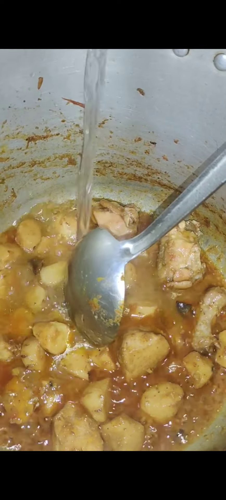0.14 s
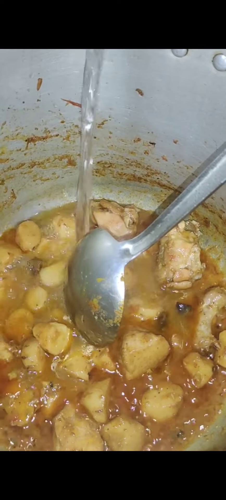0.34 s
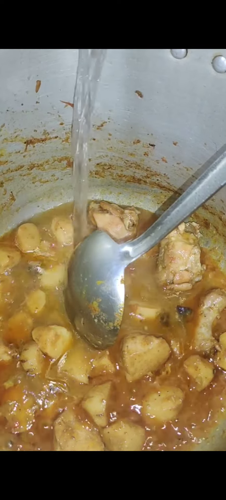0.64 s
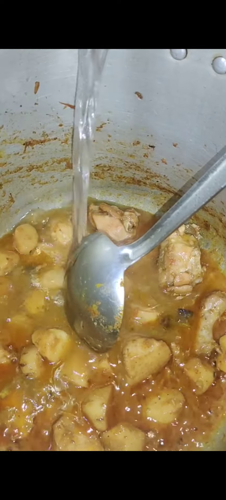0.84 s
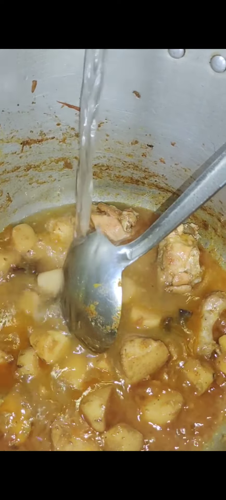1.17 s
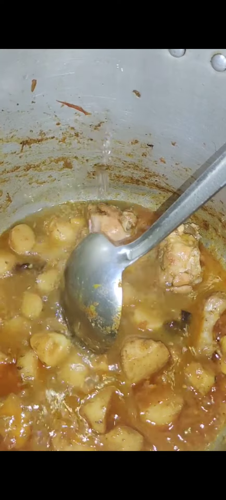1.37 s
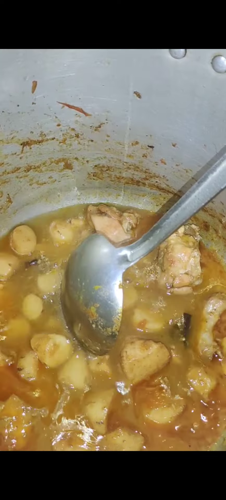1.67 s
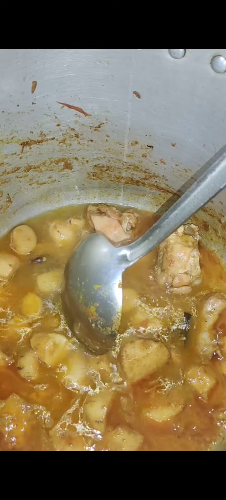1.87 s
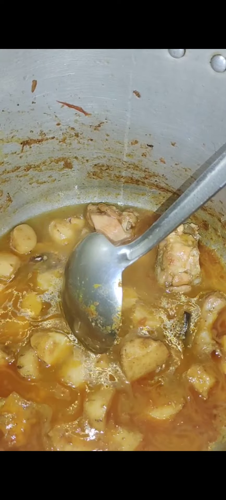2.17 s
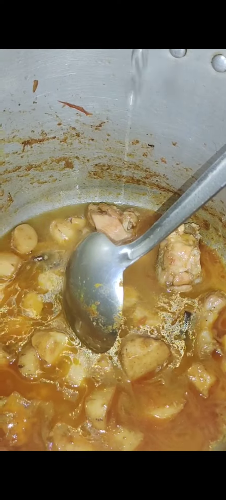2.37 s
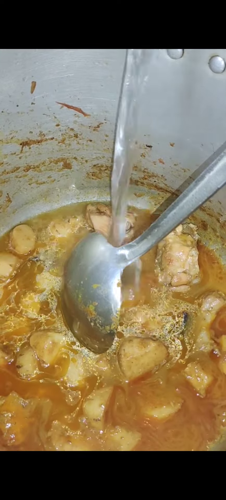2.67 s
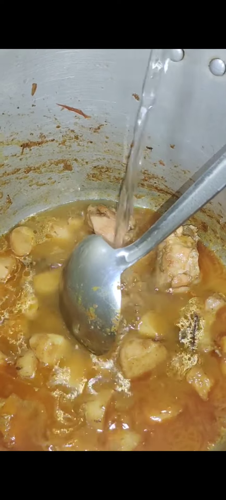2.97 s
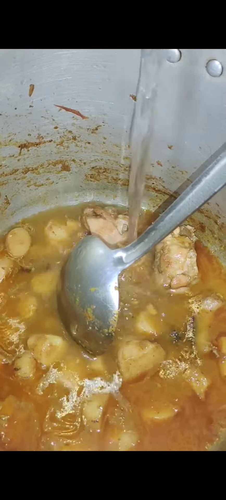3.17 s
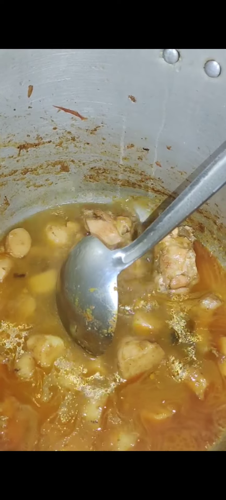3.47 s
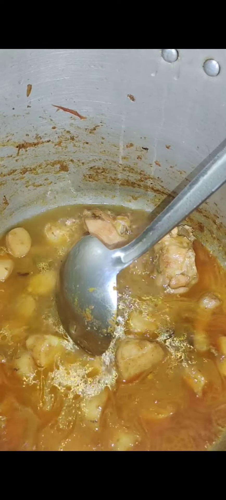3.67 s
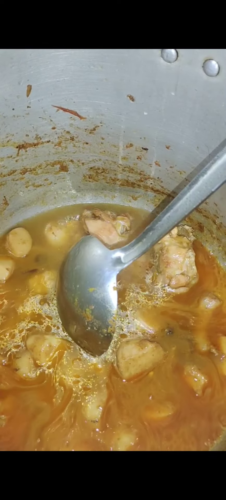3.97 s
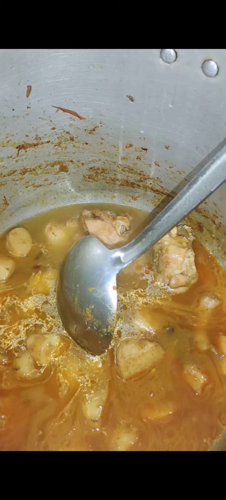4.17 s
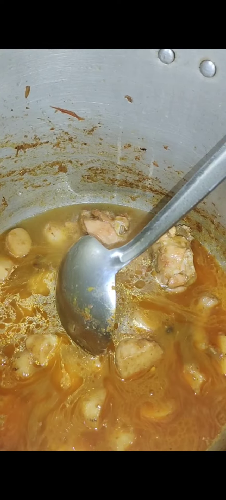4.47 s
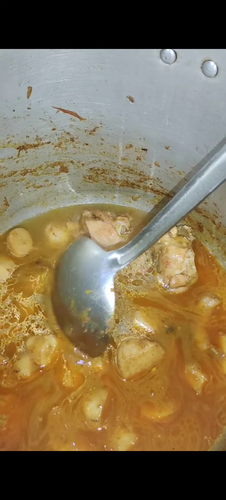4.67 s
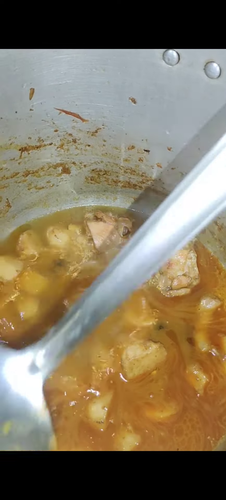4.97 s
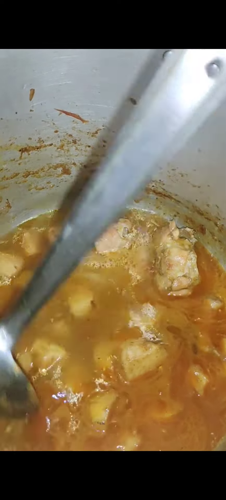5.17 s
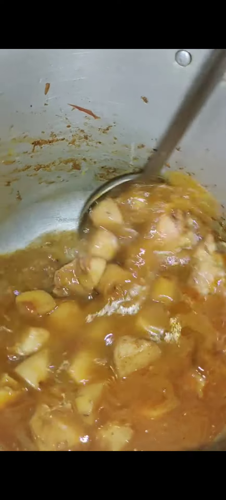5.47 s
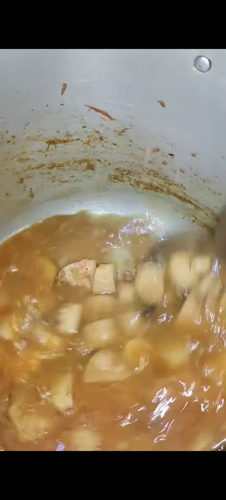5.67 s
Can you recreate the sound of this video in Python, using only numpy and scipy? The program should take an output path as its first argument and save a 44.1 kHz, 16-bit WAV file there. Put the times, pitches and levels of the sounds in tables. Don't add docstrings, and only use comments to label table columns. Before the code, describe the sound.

A close, phone-like capture in a small kitchen with a short room echo. A quiet flame roar, fine simmer and faint hum run throughout. From 0 to about 1.55 s water splashes into stew, thin and crisp, easing before strengthening around 1 s, with high bubble plinks and tiny drop bursts. Low, lumpy air thumps hit the microphone from 0.5 to 1.4 s. Only drips and simmer remain until a second, shorter pour from 2.6 to 3.55 s. Stronger thumps follow at 3.4-3.95 s. At 4.2 s a jug lands with a hollow metallic clunk, then rocks softly near 4.4 s. A ladle bowl scrapes faintly at 4.77 s and knocks clearly at 5.09 s. Stew sloshes from 5.2 s, with drops and soft metal singing around 5.4-5.65 s. The loudest sharp pot knock comes at 5.68 s, rebounding in rapid chatter before fading, with a small low gust near 5.8 s.

```python
import sys
import numpy as np
from scipy import signal
from scipy.fft import rfft, irfft
from scipy.io import wavfile

SR = 44100
rng = np.random.default_rng(int(sys.argv[2]) if len(sys.argv) > 2 else 0)


def invert_db(x):
    u = np.asarray(x, float) / 20
    return 10 ** u


def store_pcm(level_fs):
    pcm = np.round(np.clip(level_fs, -1, 1) * 32767).astype(np.int16)
    wavfile.write(sys.argv[1], SR, np.atleast_2d(pcm).T)


N = 257176
TIME_S = np.arange(N) / SR

# (time [s], level [dB])
POUR_FLOW = [
    [(0, -39.5), (0.12, -48.5), (0.77, -53), (1.0, -42.5), (1.35, -44.5), (1.53, -50), (1.57, -63.5),
     (1.85, -56.5), (2.3, -81)],
    [(2.55, -79), (2.6, -63), (2.78, -44), (2.95, -47), (3.16, -57.5), (3.2, -54.5), (3.4, -52.5),
     (3.52, -52), (3.57, -70.5)],
]
# (frequency [Hz], density [dB per Hz])
SPLASH_SPECTRUM = [(1290, -1), (2200, -5), (2570, -29), (2950, -15), (3420, 1.5), (3680, -3.5), (4130, -1),
                   (5860, -4), (7130, 2), (10100, -16.5), (15500, -24.5)]
# (time [s], length [s], frequency [Hz], level [dB])
BUBBLE_RUNS = [(2.69, 0.084, 3300, -54), (2.755, 0.055, 3020, -48), (2.77, 0.032, 4180, -46),
               (2.775, 0.073, 1990, -48), (2.825, 0.024, 3400, -49), (2.88, .1, 3260, -55.0),
               (3.18, 0.13, 5240, -55), (3.195, 0.027, 3410, -50), (3.44, 0.099, 5190, -53),
               (3.44, 0.085, 3300, -49.5), (3.47, 0.073, 6670, -49.5)]
# (time [s], peak level [dB], frequency [Hz])
BUBBLES = [(0.1166, -31, 6770), (0.3134, -30, 3900), (0.5352, -29, 7030), (0.5651, -27, 7070),
           (0.7864, -31.5, 3950), (0.851, -30, 6500), (0.9065, -21.5, 6950), (0.9457, -27, 6500),
           (0.983, -22.5, 4230), (1.0191, -23, 7060), (1.1393, -23, 7200), (1.1867, -27, 6700),
           (1.2353, -24.5, 4300), (1.28, -25, 3960), (1.3189, -22, 7100), (1.3508, -25, 5630),
           (1.5286, -31, 6600), (2.5907, -28.5, 7000), (2.77, -26, 3030), (2.825, -24.5, 3960),
           (2.8624, -29, 7270), (2.891, -25, 3970), (2.9243, -29, 6500), (2.965, -31, 4500),
           (3.3117, -30.5, 3020), (3.4443, -23.5, 5150)]
# (time [s], peak level [dB])
SPLATS = [(0.1835, -34.5), (0.2548, -35), (0.5282, -42), (0.634, -48), (0.8325, -42), (0.857, -44),
          (0.9066, -32), (0.9817, -33), (1.0261, -33), (1.1159, -40), (1.1393, -35), (1.2221, -41),
          (1.281, -31.5), (1.3274, -28.5), (1.476, -37), (1.4894, -31.5), (2.1051, -48), (2.571, -40.5),
          (2.634, -38.5), (2.823, -33), (2.913, -33), (3.1148, -40), (3.1966, -40.5), (3.3762, -43),
          (3.4695, -36.5), (5.207, -36), (5.493, -34), (5.5094, -33), (5.554, -32), (5.5694, -46)]
GURGLE_DB, GURGLE_SHARE, MEAN_FLOW_DB = -56.5, 0.69, -49

# (frequency [Hz], level [dB], t60 [s])
JUG_MODES = [(292.6, 2.5, 0.36), (520, -28, 2.2), (660, -20, 5.0), (763, -2.5, 0.074), (843, -11.5, 1.0),
             (1005, -15, 0.35), (1010, -23, 0.34), (1195, -28, 0.36), (1600, -14, 0.45), (1990, -25, 0.83),
             (2245, -27, 0.25), (2580, -28, 0.3), (2760, -43, 0.58), (3690, -6, 0.34), (3827, -9.5, 0.14),
             (4900, -14, 0.12), (5110, -15, 0.14), (5600, -19, 0.092), (6320, -7, 0.027), (6860, -16, 0.22),
             (6950, -15.5, 0.28), (7350, -18, 0.2), (7203, -32, 0.38), (7250, -29, 0.1), (8040, -23, 0.24),
             (8570, -39, 0.29)]
LADLE_MODES = [(359, -11.5, 0.32), (624, -47, 5.0), (1157, -43, 0.17), (1330, -0.5, 0.21),
               (1526, -17, 0.39), (1670, -16, 0.19), (1933, -31, 0.11), (2050, -30, 0.32),
               (2025, -7.5, 0.063), (2258, -3.5, 0.16), (2685, -10, 0.18), (2920, -11, 0.072),
               (3300, -36, 0.34), (3400, -22, 0.086), (3960, -13, 0.068), (4700, -23, 0.13),
               (5340, -33, 0.16), (6930, -5, 0.033), (7450, -12, 0.12), (8200, -10, 0.051),
               (8748, -37, 0.15), (8920, -43, 0.19)]
POT_MODES = [(316, -30, 5.0), (667, -0.5, 0.13), (1270, -41, 5.0), (1440, -12.5, 0.15), (1760, -40, 5.0),
             (2044, -7, 0.29), (2315, -7, 0.14), (2960, -28, 0.19), (3496, -10, 0.15), (3590, -7, 0.13),
             (3770, -5.5, 0.094), (4200, -6, 0.16), (4100, -21, 0.11), (4310, -7, 0.12), (4500, -21, 0.13),
             (4830, -18, 0.08), (5100, -19, 0.079), (5300, -7, 0.074), (5560, -12, 0.21), (5850, -1, 0.078),
             (6100, -33, 5.0), (6300, -22, 0.18), (6368, -32, 0.4), (6471, -23, 0.23), (6600, -18, 0.12),
             (6900, -11, 0.08), (7220, -5, 0.079), (7500, -16, 0.15)]
BOWL_MODES = [(312, -13, 0.092), (918, -10, 5.0), (1634, -20, 5.0), (1990, -15.5, 0.99), (2353, -7, 0.43),
              (2557, -13, 0.19), (2840, -6, 0.08), (3480, -23, 5.0), (4130, -15, 0.16), (4610, -13, 0.12),
              (5300, -23, 0.34), (6891, -10, 0.16)]
# (frequency [Hz], density [dB per Hz])
JUG_CLATTER = [(120, -54), (200, -42), (288, -7), (366, -7), (746, -4), (912, -15.5), (3050, -34),
               (3660, -32), (7070, -19.5), (12900, -38.5), (15800, -47)]
LADLE_CLATTER = [(120, -50), (200, -34), (379, -6), (863, -9), (1310, -8), (1830, -12), (2150, -5.5),
                 (4010, -17), (4390, -18.5), (7070, -19.5), (15800, -51)]
POT_CLATTER = [(120, -52), (200, -25), (464, -23), (668, -13.5), (1220, -26), (1470, -20.5), (3100, -22.5),
               (4240, -15), (7330, -27), (13200, -55.5), (15800, -79)]
# (time [s], length [s], first level [dB], last level [dB], clatter level [dB])
JUG_TOUCHES = [
    (4.205, 0.0063, -21, -15.5, -20),
    (4.243, 0.0061, -41, -24, -47),
]
JUG_ROCKING = [
    (4.385, 0.029, -41, -36, -55),
    (4.433, 0.021, -29, -33.5, -32.5),
    (4.483, 0.0042, -41, -42, -44),
]
BOWL_TOUCHES = [
    (4.768, 0.056, -38, -31.5, -47.5),
    (5.206, .03, -56, -64, -56),
]
LADLE_TOUCHES = [
    (5.091, 0.023, -20, -22, -24),
]
POT_TOUCHES = [
    (5.676, 0.017, -15, -26.5, -15.5),
    (5.692, 0.018, -23.5, -17.5, -31.5),
    (5.708, 0.0182, -20.5, -19, -22),
    (5.73, 0.056, -37.5, -34.5, -38.5),
]

# (time [s], length [s], frequency [Hz], level [dB])
WALL_SONG = [(4.76, .04, 306, -34.5), (5.36, 0.097, 344, -40), (5.435, 0.111, 314, -34),
             (5.55, 0.16, 340, -36), (5.45, 0.21, 885, -39.5), (5.455, 0.03, 2000, -37.5),
             (5.505, 0.09, 1770, -40.5), (5.485, 0.045, 2350, -40.5), (5.39, 0.089, 3500, -54),
             (5.5, .04, 380, -38)]
# (time [s], length [s], frequency [Hz], level [dB])
JUG_SONG = [(4.232, 0.074, 991, -27.5), (4.205, .11, 293, -29.5), (4.43, 0.0342, 293, -29)]
# (time [s], level [dB])
STIR_LEVEL = [(5.196, -72), (5.204, -51.5), (5.476, -42.5), (5.51, -36), (5.535, -45), (5.62, -43.5),
              (5.665, -50)]
# (frequency [Hz], density [dB per Hz])
SLOSH_SPECTRUM = [(1470, 0.5), (2500, -5.5), (3000, -16), (3340, -3), (3920, -3.5), (4820, -8), (6690, 0),
                  (9290, -16), (15500, -34)]

# (time [s], peak level [dB], rise [ms])
EDDIES = [(0.674, -19, .76), (0.708, -20, 0.7), (0.782, -14, 0.8), (0.852, -17.5, 0.61), (0.892, -13, 0.6),
          (0.925, -11.5, 0.51), (1.041, -13.5, 0.67), (1.065, -17, 0.88), (1.117, -19, 0.87),
          (1.162, -16, 0.82), (3.423, -12.5, 0.76), (3.493, -16, 0.61), (3.547, -11, 0.55),
          (3.565, -19.5, 0.37), (3.586, -10.5, 0.45), (3.632, -10.5, 0.54), (3.68, -4.5, 0.81),
          (3.721, -5, 0.74), (3.764, -24, .4), (3.807, -7.5, 0.44), (3.839, -14, 0.81),
          (3.878, -19.5, 0.56), (3.953, -17.5, 1.7)]
# (start [s], peak [s], end [s], rumble level [dB])
GUSTS = [(0.519, 0.94, 1.225, -18.5), (1.23, 1.31, 1.39, -32.5), (1.472, 1.528, 1.556, -27),
         (1.63, 1.7, 1.8, -38.5), (3.422, 3.73, 3.89, -16.5), (5.78, 5.787, 6.04, -28.5)]
SWELL_DB, SINK_DB, GUST_EDGE_S = 15.5, 10.5, 0.014

# (frequency [Hz], density [dB per Hz])
SIMMER_SPECTRUM = [(29, -42), (50, -2), (81, 0), (122, -26), (163, -0.5), (222, -17), (263, -9.5),
                   (503, -9.5), (541, -14), (795, -16.5), (987, -18.5), (1090, -18.5), (1320, -22),
                   (1520, -22), (15700, -55.5)]
SIMMER_DB = -44
# (frequency
# [Hz], width [Hz], level [dB])
STEADY_HUMS = [(172, 120, -53.5), (299.3, 24.5, -53.5), (3480, 12, -74.5), (4600, 13, -76.0),
               (6890, 720, -65)]

KITCHEN_T60_S, KITCHEN_DB = 0.36, -12
BASS_CUT_HZ, TOP_HZ = 105, 15750


def rms_one(x):
    return x / np.sqrt(np.mean(x ** 2) + 1e-20)


def drift(rate_hz):
    r = np.exp(-80 * np.pi * rate_hz / SR)
    noise = rng.standard_normal(N // 40 + 2002)
    slow = signal.lfilter([1], [1, -2 * r, r * r], noise)[2000:]
    return np.interp(np.arange(N) / 40, np.arange(len(slow)), rms_one(slow))


def colour(x, spectrum):
    hz, db = np.transpose(spectrum)
    log_hz = np.log(np.arange(len(x) // 2 + 1) * SR / len(x) + 1)
    gain = invert_db(np.interp(log_hz, np.log(hz), db, left=-90, right=-90))
    return rms_one(irfft(rfft(x) * gain, len(x)))


def ring(clicks, hz, t60_s):
    r, w = invert_db(-60 / (t60_s * SR)), 2 * np.pi * hz / SR
    return signal.lfilter([0, np.sin(w)], [1, -2 * r * np.cos(w), r * r], clicks + 1e-18)


def grains(per_s, spread_db, size=N):
    heights = invert_db(spread_db * np.minimum(rng.exponential(1, size), 4))
    heights = heights * rng.choice([-1, 1], size)
    return heights * (rng.random(size) < per_s / SR)


def spells(rows, per_s, width_hz):
    out = np.zeros(N)
    for start_s, length_s, hz, db in rows:
        swell = np.sin(np.pi * np.clip((TIME_S - start_s) / length_s, 0, 1)) ** 0.5
        sung = swell * ring(grains(per_s, 3.4), hz, 2.75 / max(width_hz, 5))
        out += invert_db(db - 2.0) * rms_one(sung) * np.sqrt(length_s * SR / N)
    return out


def stream():
    flow_s, flow_db = np.transpose([row for pour in POUR_FLOW for row in pour])
    flow_db = np.interp(TIME_S, flow_s, flow_db)
    fizz = swarm(450.0, 3030, 8900, cycles=33.0)
    splash = spray(220.0, SPLASH_SPECTRUM, smooth=0.24) + invert_db(-2.5) * fizz
    gurgle_db = GURGLE_DB + GURGLE_SHARE * (flow_db - MEAN_FLOW_DB)
    gurgle = invert_db(gurgle_db) * swarm(500.0, 1310, 2330, cycles=31.0)
    wet = invert_db(flow_db - 3.0) * splash + gurgle
    pouring = TIME_S < POUR_FLOW[-1][-1][0]
    return wet * pouring + spells(BUBBLE_RUNS, per_s=140.0, width_hz=150.0)


def puffs(per_s):
    burst = np.exp(-np.arange(600) / (0.002 * SR))
    drops = np.abs(grains(per_s * invert_db(3.7 * drift(15)), 5.7))
    return rms_one(signal.fftconvolve(drops, burst)[:N])


def spray(per_s, spectrum, smooth):
    wide = puffs(0.34 * per_s)
    out = np.zeros(N)
    edges_hz = np.geomspace(1500, 16000, 8)
    for low_hz, high_hz in zip(edges_hz, edges_hz[1:]):
        band_pass = signal.butter(2, [low_hz, high_hz], "band", fs=SR, output="sos")
        band = signal.sosfilt(band_pass, rng.standard_normal(N))
        out += band * (smooth + 0.12 * wide + 0.54 * puffs(0.6 * per_s))
    return colour(out, spectrum)


def swarm(per_s, low_hz, high_hz, cycles):
    out = np.zeros(N)
    for hz in np.geomspace(low_hz, high_hz, 20):
        clicks = grains(per_s / 20 * invert_db(7.6 * drift(8)), 2.07)
        out += ring(clicks, hz, cycles / hz)
    return rms_one(out)


def bubbles():
    out, t = np.zeros(N), np.arange(1500) / SR
    for start_s, db, hz in BUBBLES:
        i = round(start_s * SR)
        fall = invert_db(db - 6.0 - 60 * t * hz / 103.0)
        attack = np.minimum(t / 0.00043, 1)
        out[i:i + len(t)] += fall * attack * np.sin(2 * np.pi * hz * t * (1 + 1.0 * t))
    return out


def splats():
    hits = np.zeros(N)
    hits[[round(s * SR) for s, db in SPLATS]] = invert_db(np.array(SPLATS)[:, 1] - 7.5)
    envelope = signal.fftconvolve(hits, np.exp(-np.arange(900) / (0.0096 * SR)))[:N]
    high_pass = signal.butter(2, 4500, "high", fs=SR, output="sos")
    bright = signal.sosfilt(high_pass, colour(rng.standard_normal(N), SPLASH_SPECTRUM))
    return envelope * rms_one(bright)


def blows():
    out = strike(JUG_TOUCHES, JUG_MODES, JUG_CLATTER, soft_hz=15000, longest_s=0.28, damp_db=2.0, t60_s=0.19)
    out += strike(JUG_ROCKING, JUG_MODES, JUG_CLATTER, soft_hz=500, longest_s=0.17, damp_db=2.1, t60_s=0.16)
    out += strike(BOWL_TOUCHES, BOWL_MODES, LADLE_CLATTER, soft_hz=15000, longest_s=0.27, damp_db=1.0, t60_s=0.14)
    out += strike(LADLE_TOUCHES, LADLE_MODES, LADLE_CLATTER, soft_hz=15000, longest_s=0.29, damp_db=7.5, t60_s=0.14)
    out += strike(POT_TOUCHES, POT_MODES, POT_CLATTER, soft_hz=15000, longest_s=0.13, damp_db=12.5, t60_s=0.26)
    return out


def strike(touches, modes, clatter, soft_hz, longest_s, damp_db, t60_s):
    out = np.zeros(N)
    soft = signal.butter(1, min(soft_hz, 20000), fs=SR)
    for start_s, length_s, first_db, last_db, clatter_db in touches:
        i = round(start_s * SR)
        t = np.arange(min(N - i, SR // 2)) / SR
        late_s = np.maximum(t - length_s, 0)
        swell_db = (last_db - first_db) * np.clip(t / max(length_s, 0.001), 0, 1)
        chatter = grains(900, 2.55, size=len(t)) * (t < length_s) / np.sqrt(1 + 1800 * length_s)
        chatter[20] = 0.47
        chatter = signal.lfilter(*soft, chatter * invert_db(first_db + swell_db))
        rings = mode_rings(chatter, modes, longest_s)
        haze = clatter_haze(clatter, late_s / max(t60_s, 0.01))
        haze *= invert_db(clatter_db + swell_db) * np.minimum(t / 0.0012, 1)
        damping = invert_db(-damp_db * (1 - np.exp(-late_s / 0.005)))
        out[i:i + len(t)] += (rings + haze) * damping
    return out


def mode_rings(chatter, modes, longest_s):
    out = np.zeros(len(chatter))
    for (hz, db, mode_t60_s), (u, split) in zip(modes, rng.normal(0, 1, (len(modes), 2))):
        decay_s = np.clip(mode_t60_s, 0.02, longest_s)
        pair = ring(chatter, hz, decay_s) + ring(chatter, hz * (1 + 0.007 * split), decay_s)
        out += invert_db(db + 1.3 * u - 4.5) * np.sign(u) * pair
    return out


def clatter_haze(clatter, after):
    haze = colour(rng.standard_normal(len(after)), clatter)
    lows = signal.sosfiltfilt(signal.butter(2, 2500, fs=SR, output="sos"), haze)
    return (lows + (haze - lows) * invert_db(-35.0 * after)) * invert_db(-60 * after)


def stirring():
    fizz = colour(swarm(400.0, 1597, 8000, cycles=130.0), SLOSH_SPECTRUM)
    slosh = 0.78 * spray(200.0, SLOSH_SPECTRUM, smooth=0.9) + invert_db(-3.0) * fizz
    stir_s, stir_db = np.transpose(STIR_LEVEL)
    slosh = slosh * invert_db(np.interp(TIME_S, stir_s, stir_db, left=-140, right=-140))
    wall = spells(WALL_SONG, per_s=900.0, width_hz=33.0)
    jug = spells(JUG_SONG, per_s=1200.0, width_hz=9.9)
    return wall + jug + slosh


def draughts():
    soft = signal.butter(4, 330, fs=SR, output="sos")
    pushes = signal.sosfilt(soft, grains(150, 3.16) + 0.048 * rng.standard_normal(N))
    lumps = rms_one(ring(pushes, 101, 0.017)) + 0.43 * rms_one(pushes)
    eddies, t = np.zeros(N), np.arange(2000) / SR
    for start_s, db, rise_ms in EDDIES:
        i = round((start_s + 0.00353) * SR)
        turn = 1000 * t / np.clip(rise_ms, 0.25, 3)
        eddies[i:i + len(t)] -= invert_db(db + 2.5) * turn ** 3 * np.exp(-turn) * (1 - turn / 4.3)
    return lumps * invert_db(-1.5) * gusts() + eddies


def gusts():
    gain = np.zeros(N)
    for start_s, peak_s, end_s, db in GUSTS:
        corners_s = [start_s - GUST_EDGE_S, start_s, peak_s, end_s, end_s + GUST_EDGE_S]
        shape_db = np.interp(TIME_S, corners_s, [-40, -SWELL_DB, 0, -SINK_DB, -40], left=-99, right=-99)
        gain += invert_db(db + shape_db)
    return gain


def simmer():
    out = invert_db(SIMMER_DB + 0.61 * drift(4)) * colour(rng.standard_normal(N), SIMMER_SPECTRUM)
    for hz, width_hz, db in STEADY_HUMS:
        hum = rms_one(ring(rng.standard_normal(N), hz, 2.44 / width_hz))
        out += hum * invert_db(db + 2.0 * drift(6.0))
    return out


def kitchen(x):
    t = np.arange(SR // 2) / SR
    tail = rng.standard_normal(len(t)) * invert_db(-60 * t / KITCHEN_T60_S) * (t > 0.006)
    tail = signal.lfilter([1], [1, -0.5], tail)
    return invert_db(KITCHEN_DB) * signal.fftconvolve(x, tail / np.linalg.norm(tail))[:N]


def scene():
    near = stream() + bubbles() + splats() + blows() + stirring()
    return (near + draughts() + simmer() + kitchen(near))[None]


def band_limit(x):
    return signal.sosfilt(signal.butter(12, 16300, fs=SR, output="sos"), x)


def record(dry):
    bass_cut = signal.butter(3, BASS_CUT_HZ, "high", fs=SR, output="sos")
    top_cut = signal.cheby2(12, 50, TOP_HZ, fs=SR, output="sos")
    mix = signal.sosfilt(top_cut, signal.sosfilt(bass_cut, dry))
    return band_limit(mix)


dry = scene()
out = record(dry)
store_pcm(out)
```